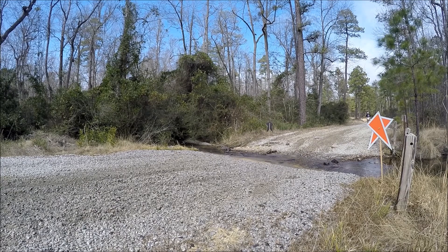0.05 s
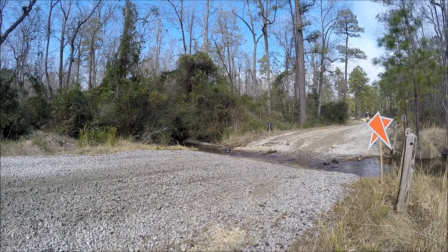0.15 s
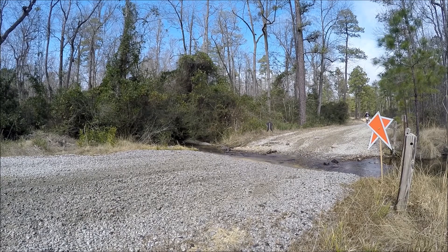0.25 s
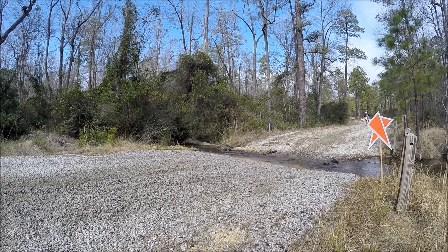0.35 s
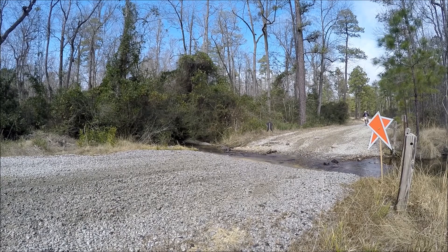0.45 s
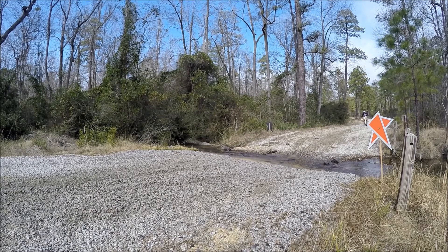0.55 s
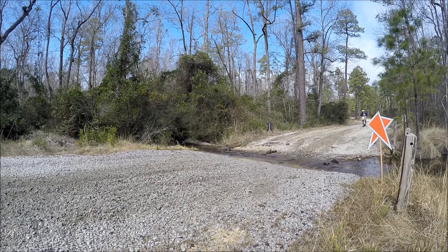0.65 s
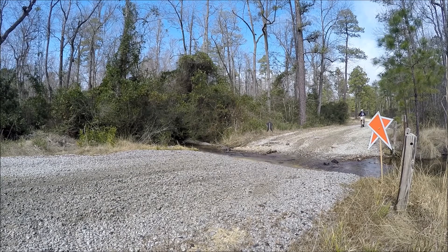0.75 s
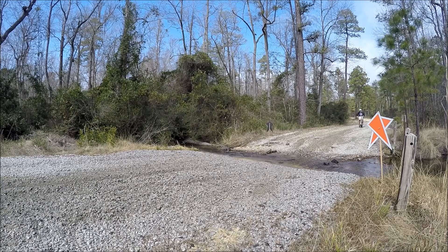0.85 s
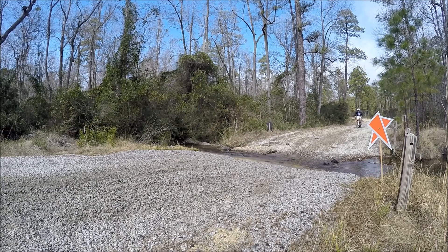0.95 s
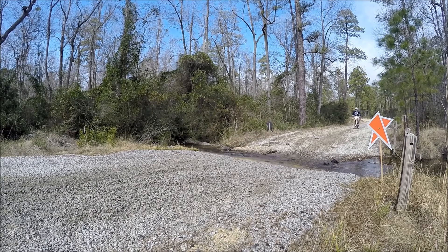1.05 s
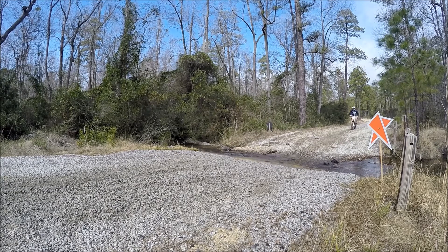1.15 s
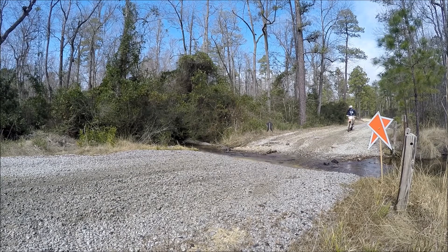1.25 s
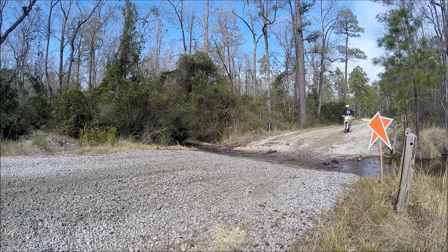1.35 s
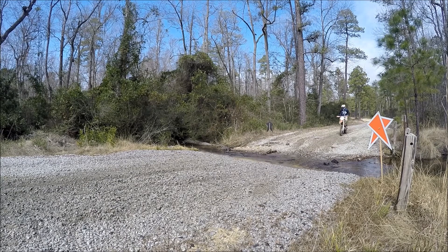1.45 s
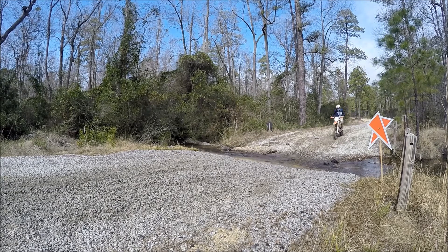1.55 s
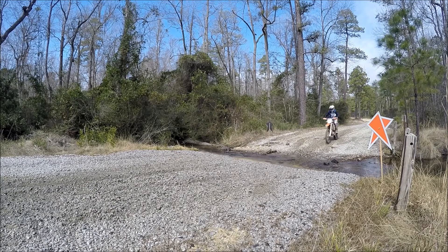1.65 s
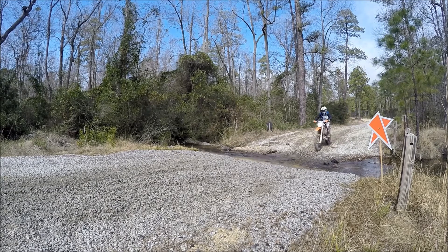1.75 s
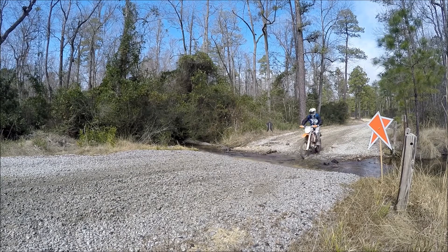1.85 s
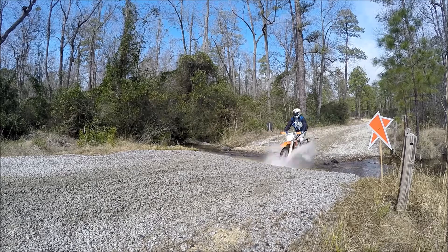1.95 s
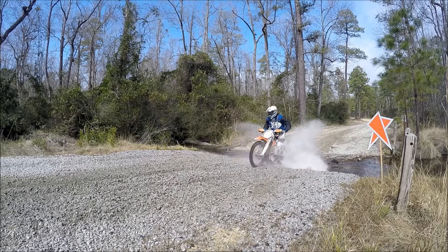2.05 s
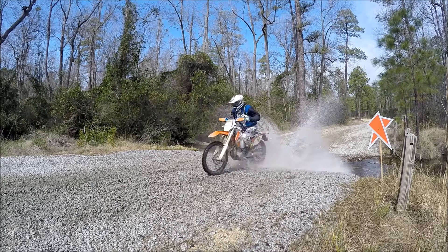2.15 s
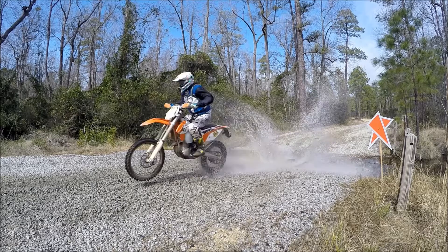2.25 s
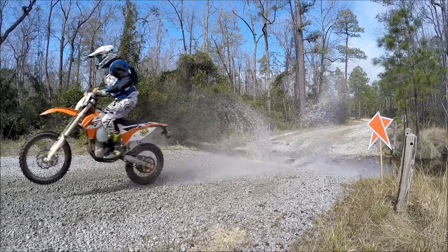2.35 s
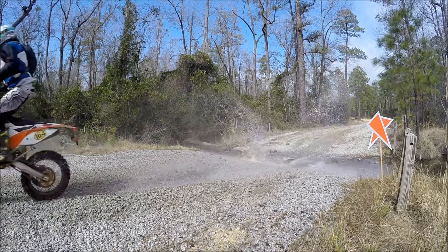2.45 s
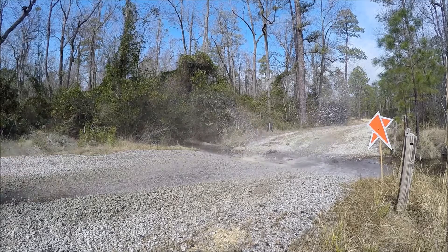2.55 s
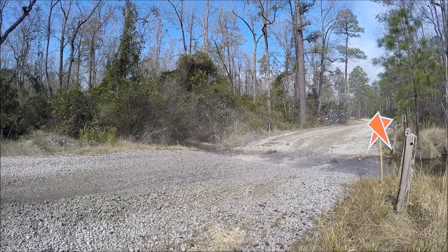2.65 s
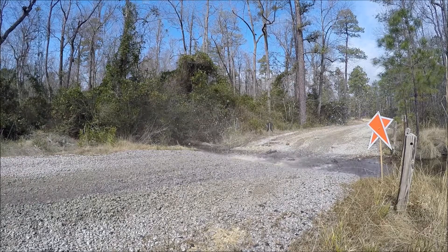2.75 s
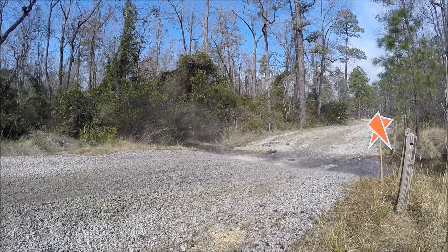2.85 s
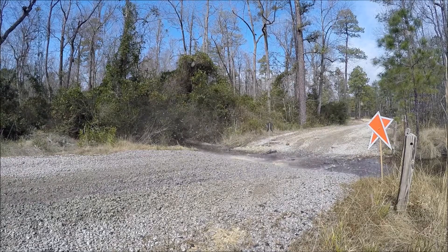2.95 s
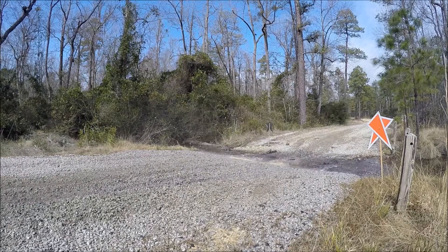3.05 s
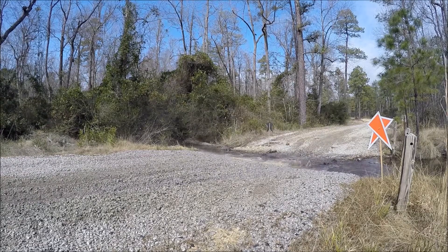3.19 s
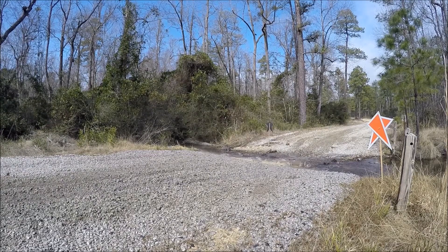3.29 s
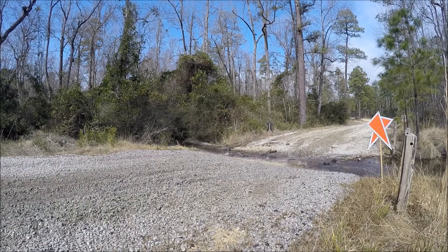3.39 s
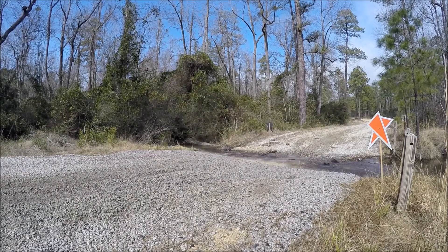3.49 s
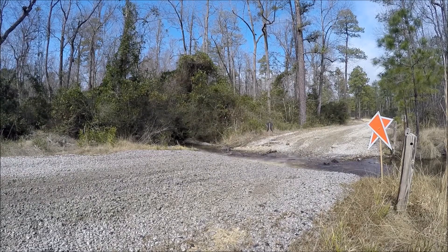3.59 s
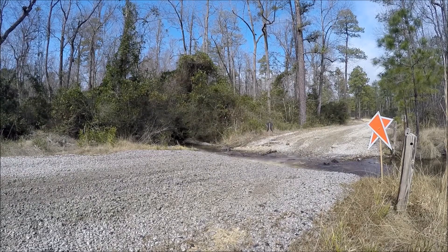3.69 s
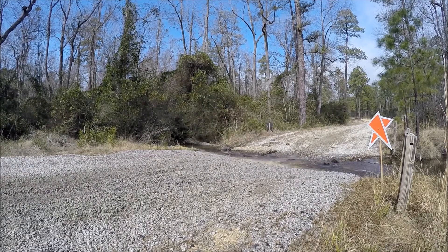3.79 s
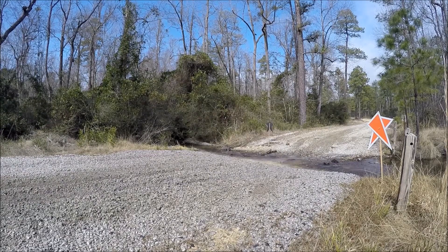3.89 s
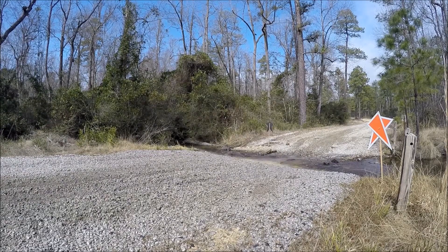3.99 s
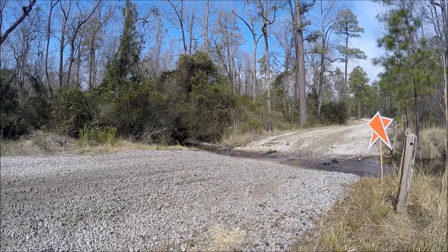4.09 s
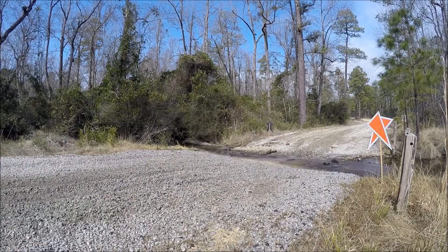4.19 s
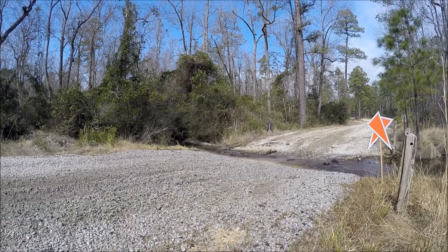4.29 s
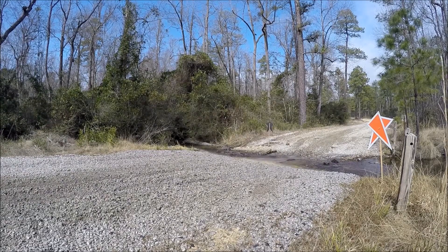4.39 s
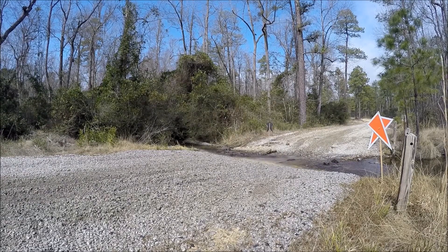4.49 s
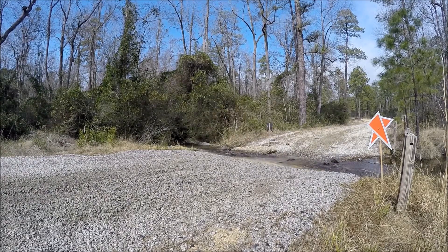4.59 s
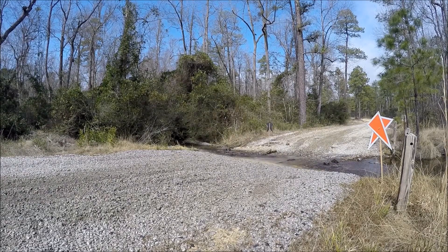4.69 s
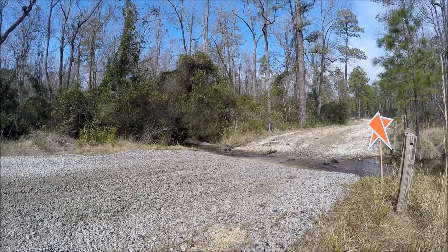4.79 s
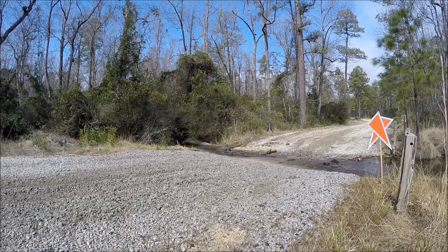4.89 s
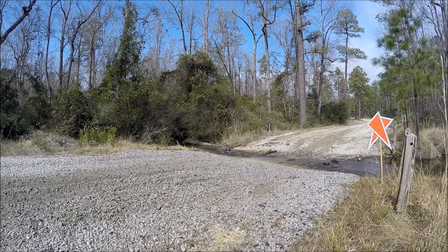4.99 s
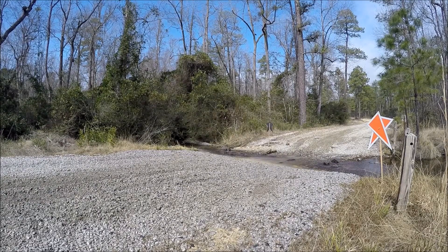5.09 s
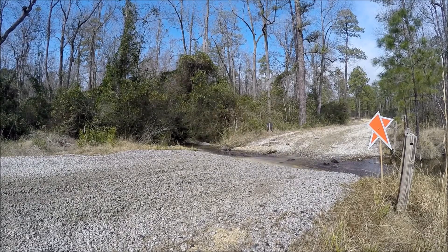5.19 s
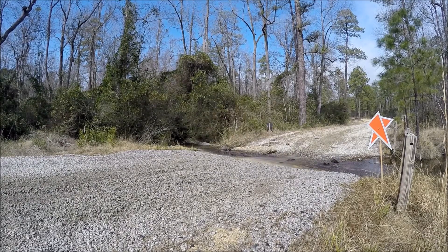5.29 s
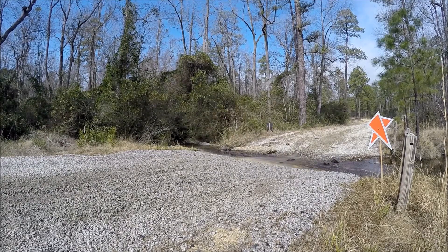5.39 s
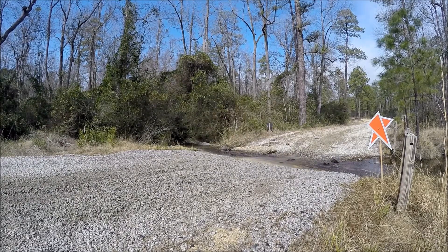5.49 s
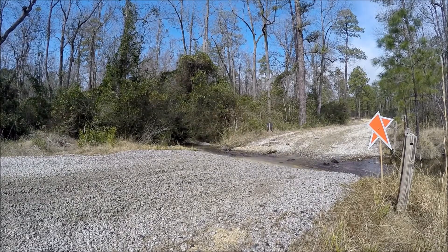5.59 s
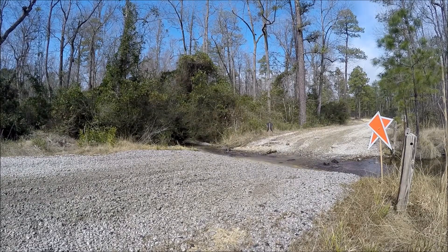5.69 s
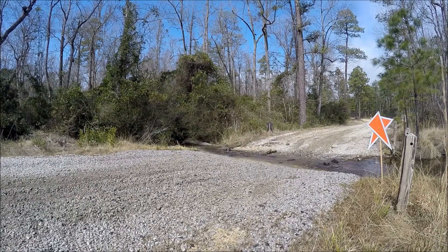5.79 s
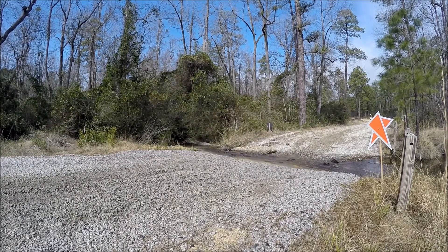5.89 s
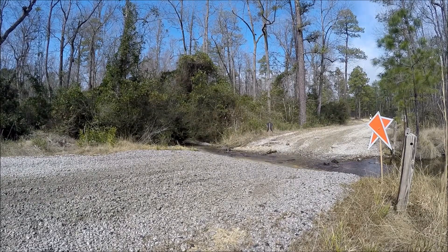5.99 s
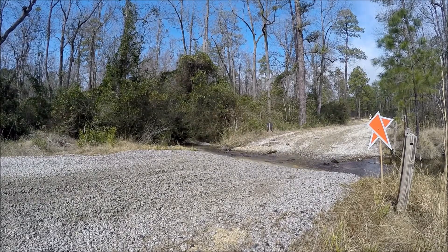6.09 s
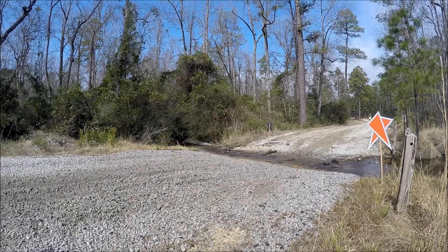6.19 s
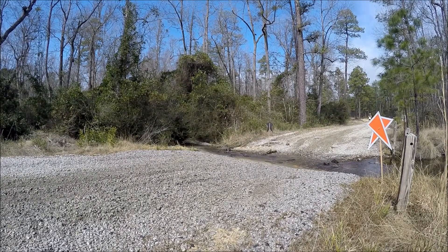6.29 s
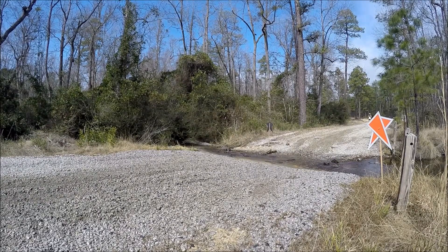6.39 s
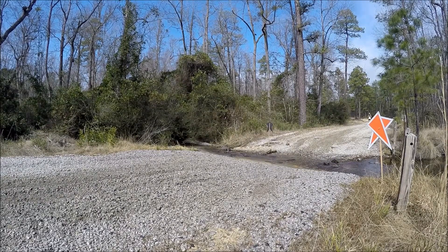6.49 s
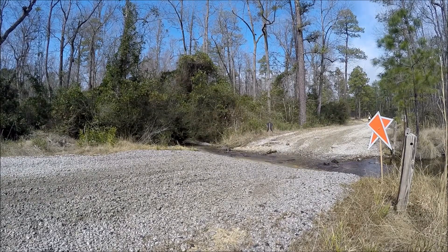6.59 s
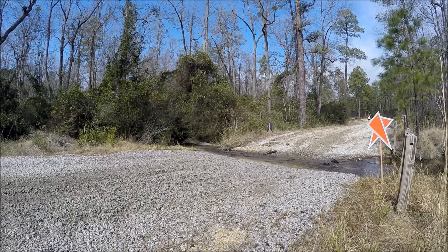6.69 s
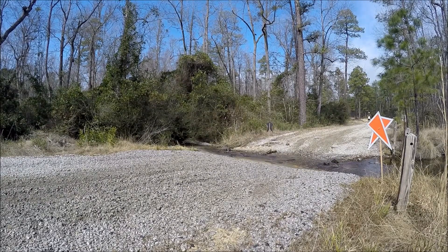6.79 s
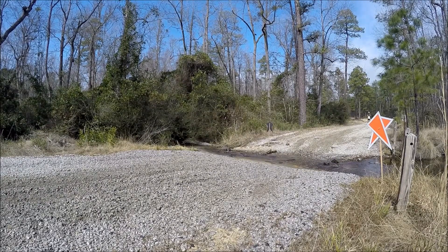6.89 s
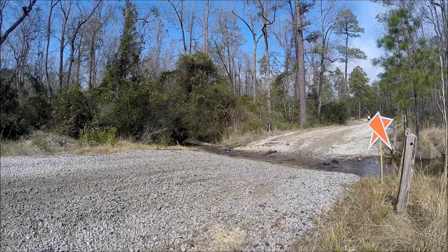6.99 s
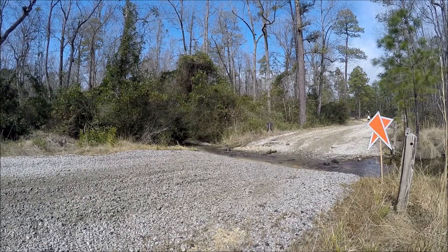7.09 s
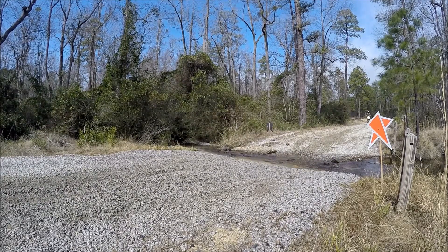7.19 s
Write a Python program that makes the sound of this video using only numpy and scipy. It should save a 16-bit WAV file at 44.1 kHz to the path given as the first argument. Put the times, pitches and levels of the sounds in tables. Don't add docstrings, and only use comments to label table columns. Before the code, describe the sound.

A single-cylinder dirt bike approaches on a gravel forest road, splashes through a creek, barks loudly past, revs up, shifts and fades among trees.

```python
import sys
import numpy as np
from scipy import signal
from scipy.fft import rfft, irfft
from scipy.io import wavfile
from scipy.ndimage import uniform_filter1d, map_coordinates

SR = 44100
rng = np.random.default_rng(int(sys.argv[2]) if len(sys.argv) > 2 else 0)


def materialize(psi):
    bounded = np.clip(np.atleast_2d(psi).T, -1, 1)
    quanta = np.round(bounded * 32767).astype(np.int16)
    wavfile.write(sys.argv[1], SR, quanta)


def boost_factor(decibels):
    exponent = np.asarray(decibels, float) / 20
    return 10 ** exponent


N = 319712

# frequency in Hz, strength in dB per Hz.
FOREST_COLOUR = [(240, -27.5), (400, 2.5), (752, -11.5), (2010, -7), (2870, -17), (3190, -35), (4210, -8),
                 (5140, -24), (14200, -35), (15800, -54)]
# frequency in Hz, strength in dB per Hz.
RUMBLE_COLOUR = [(15, -51), (35, -12), (60, -10), (110, -7.5), (180, -13), (350, -16), (600, -58.5)]
# frequency in Hz, strength in dB per Hz.
BUFFET_COLOUR = [(20, -36), (44, -10), (60, -2), (85, -18), (130, -39), (200, -97)]
# frequency in Hz, time to fall by 60 dB in seconds.
TREE_ECHO = [(100, 1), (1000, 0.45), (8000, 0.28)]
# frequency in Hz, strength in dB per Hz.
HOUSING_COLOUR = [(350, -17.5), (600, -1.5), (656, 0.5), (762, -5), (998, 3.5), (1660, 5), (1810, -0.5),
                  (2300, 5.5), (2520, 0), (2900, -4), (3300, 3), (3680, -1), (4150, 3.5), (5120, -6.5),
                  (6500, -32.5), (8450, -63), (14300, -120)]
# frequency in Hz, width in Hz, strength in dB.
HOUSING_RINGS = [(1058, 69, -5.5), (2010, 71, 2), (2346, 34, -4.5), (3250, 300, 0.5), (3910, 100, 1),
                 (5370, 41, -17)]
# frequency in Hz, strength in dB per Hz.
AIRY_COLOUR = [(3240, -37), (5500, -1.5), (5770, -0.5), (6220, -5), (6740, -4.5), (7560, -12), (9260, -16),
               (10300, -14), (11600, -23), (13000, -16), (14900, -26), (15800, -38)]

# time in seconds, firings per second, bark in dB.
FAR_ENGINE = [
    (6.3, 35.3, -68),
    (6.52, 37.2, -61.5),
    (6.624, 35.2, -57.5),
    (6.836, 34, -58.5),
    (6.96, 39, -60),
    (7.044, 40.3, -60),
    (7.122, 37, -55.5),
    (7.25, 34, -57.5),
]
# frequency in Hz, strength in dB per Hz.
FAR_PIPE_COLOUR = [(15, -40), (25, 6), (52, -3), (101, -1), (111, -16), (165, -5), (307, -2), (489, -10),
                   (616, -31), (800, -45), (1040, -69), (1760, -120)]
# frequency in Hz, level in dB.
FAR_HUM = [(95, -55), (106, -41), (120, -54), (132, -55), (142, -52), (156, -43.5), (165, -51)]

# time in seconds, peak in dB, airy part in dB relative,
# time to fall by 60 dB in seconds, pitch in Hz.
SHORT_KNOCKS = [
    (2.127, -3.5, -20, 0.047, 3480),
    (4.9117, -25, -5.5, 0.027, 3230),
    (5.071, -29, -0.5, 0.017, 3630),
    (5.1725, -34.5, 0, 0.017, 3940),
    (5.2688, -23, -8.5, 0.013, 3521),
    (6.483, -37.5, -35, 0.051, 1689),
]
# start in seconds, length in seconds, level in dB,
# fine spray in dB relative, low part in dB relative.
WATER_SHEETS = [
    (1.749, 0.015, -39.5, -12, -4),
    (1.857, .02, -36, -17, -9),
    (1.888, 0.013, -27.5, -16, -15),
    (1.935, .06, -26, -15, -11),
    (2.052, 0.12, -32.5, -15.5, -6.5),
    (2.189, 0.083, -24.5, -18.5, -1.5),
    (2.277, 0.026, -23, -19, -8),
    (2.332, .08, -26.5, -7.5, -6),
    (2.465, 0.048, -31.5, -10, -3),
    (2.514, 0.04, -37, 1.5, 4.5),
]

# time in seconds, firings per second.
ENGINE_SPEED = [(0, 49.7), (.6, 50.5), (.86, 50.5), (.98, 43), (1.15, 47), (1.6, 50.6), (2.17, 52.6),
                (2.78, 50.6), (2.9, 54.9), (3.1, 54.6), (3.49, 68.4), (3.66, 63.1), (3.95, 68.3),
                (4.05, 66.6), (4.2, 54.5), (4.35, 49.3), (4.71, 55.4), (5.1, 52.3)]
# slips, fastest, bites and grips in seconds, extra firings per second.
WHEEL_SPINS = [
    (0.248, 0.453, .52, 0.57, 3.47),
    (1.597, 1.739, 2.04, 1.72, 2.7),
    (1.806, 1.91, 1.93, 1.84, 2.8),
    (2.179, 2.323, 2.52, 2.6, 18.5),
    (3.221, 3.333, 3.12, 3.5, 1.6),
    (4.383, 4.458, 4.55, 4.68, 1.494),
    (4.74, 4.858, 4.86, 4.83, 1.294),
    (5.039, 5.205, 6, 5.54, 1.33),
    (5.659, 5.829, 5.88, 5.97, 5.4),
]
# time in seconds, level in dB.
MACHINE_LEVEL = [(0, -46.5), (.8, -44.5), (1.2, -42), (1.6, -33), (1.8, -32.5), (2.13, -27), (2.21, -19),
                 (2.33, -26), (2.55, -23), (2.72, -18.5), (2.87, -12.5), (3.05, -17), (3.21, -17.5),
                 (3.45, -24), (4.0, -28), (4.5, -27), (5.2, -32.5), (5.85, -38.5)]
# opens, eases and time to shut in seconds, aspect,
# share of crack in the treble (0 to 1) at first and at last.
THROTTLE_OPENINGS = [(-.2, 0.098, 0.14, "idle", 0.2, .01), (0.044, .84, 0.054, "ahead", 0.37, 0),
                     (0.783, 1.078, 0.14, "overrun", 0, .01), (1.034, 2.135, 0.11, "ahead", 0.05, 0.12),
                     (2.084, 2.29, 0.098, "abreast", 0.6, 0), (2.25, 2.603, 0.088, "wading", 0.08, 0.3),
                     (2.559, 2.799, 0.071, "lugging", 0.16, 0.88),
                     (2.745, 3.306, 0.076, "lugging", 0.96, .97),
                     (3.261, 4.027, 0.053, "revving", 0.83, 0.38),
                     (4.23, 5.198, 0.069, "leaving", 0.86, 0.3), (5.212, 5.418, 0.19, "easing", .97, 0.86),
                     (5.417, 5.64, .1, "idle", 0, .01), (5.645, 5.849, .08, "leaving", 0.66, .7),
                     (5.8, 6.499, 0.078, "idle", 0.03, 0.05)]
ASPECT_LEVELS = {"shut": (-10.5, -20, -14.5, -20.5, -32.5), "idle": (-10, -11, -5.5, -26.5, -35),
                 "overrun": (5.5, -4, -1.5, -11.5, -21), "ahead": (-1.5, 0, -8.5, -9.5, -24.5),
                 "abreast": (0.5, -12, 1.5, -12, -20.5), "wading": (-1, -2.5, 0, -11.5, -23.5),
                 "lugging": (-0.5, -13.5, -4.5, -9, -25), "revving": (1.5, -6, 6.5, -7.5, -23),
                 "easing": (-4.5, -5, -6.5, -9.5, -29), "leaving": (-0.5, -8, -7, -11.5, -27)}
ASPECT_ROUGHNESS = {"shut": .22, "idle": .15, "overrun": .08, "ahead": .13, "abreast": .07, "wading": .15,
                    "lugging": .04, "revving": .035, "leaving": .045, "easing": .06}
# time in seconds, length in seconds, boost in dB.
IDLE_LURCHES = [
    (0.053, 0.086, 10),
    (6.016, .045, 6),
    (6.14, 0.032, 1.5),
    (6.276, 0.032, 4),
    (6.38, 0.039, 4.5),
]

# frequency in Hz, strength in dB per Hz.
BARK_COASTING = [(65, -43), (110, -7.5), (135, 9), (311, -11), (451, -10), (800, -28), (1040, -71),
                 (1760, -120)]
BARK_AHEAD = [(76, -70.5), (130, -15), (167, -12), (190, 0.5), (205, -1), (284, -6.5), (419, -1),
              (604, -17), (800, -23), (1040, -86), (1760, -120)]
BARK_ABREAST = [(76, -24.5), (130, -23), (156, -0.5), (183, -5.5), (226, -6), (270, 0.5), (419, -7.5),
                (560, -10.5), (800, -20), (1040, -69), (1760, -120)]
BARK_LUGGING = [(76, -53), (130, -8), (178, -22), (205, -10.5), (236, -7), (270, -1.5), (350, -11.5),
                (381, -11), (738, -20), (850, -36), (1100, -25), (1870, -120)]
BARK_REVVING = [(76, -60), (130, 6), (262, -2), (323, 1.5), (464, 3.5), (690, -13.5), (800, -51),
                (1100, -50), (1870, -120)]
BARK_LEAVING = [(76, -37), (130, -20), (155, -15.5), (262, 3.5), (387, -1), (850, -22), (1100, -11),
                (1870, -120)]
# frequency in Hz, strength in dB per Hz.
CRACK_NEAR = [(410, -25), (700, -13), (850, -9), (1050, -1.5), (2040, -21), (2280, -12), (2890, -17.5),
              (4080, -13), (4570, -22.5), (8000, -59), (10400, -79), (17600, -120)]
CRACK_FAR = [(410, -36), (700, -17), (931, -7), (1040, 7.5), (1410, -2), (2280, -8.5), (2530, -7),
             (3650, 0), (4570, -13.5), (5770, -11.5), (8000, -30), (10400, -97), (17600, -120)]
# time in seconds, delay in milliseconds.
ROAD_BOUNCE = [(0, 0.36), (2.3, 0.82), (2.47, 1.7), (2.56, 1.85), (2.68, 1.068), (2.97, 0.7), (3.3, .5),
               (4.3, .22), (7.25, 0.24)]

FOREST_DB = -57.5
SPLIT_HZ = 1500
COAST_HZ_PER_S, GONE_S = 8.2, 6.45
SPIN_SAG = 0.6
SPLASH_RISE_S, SPLASH_FALL_DB_PER_S = 0.005, 206
LOW_DB, FIZZ_DB = -3, -16.5
STILL_DB = -62
OPEN_S = 0.12
LINGER_S = 0.04


def unit(x):
    return x / np.sqrt(np.mean(x ** 2) + 1e-20)


def along(points, hz):
    f, v = np.transpose(points)
    return np.interp(np.log(hz + 1), np.log(f + 1), v)


def curves(rows):
    s, *columns = np.transpose(rows)
    return [np.interp(np.arange(N) / SR, s, c) for c in columns]


def coloured(x, spectrum, lag=1, turn=0):
    m = 8192
    strength = boost_factor(along(spectrum, np.fft.rfftfreq(m, 1 / SR)))
    cepstrum = irfft(np.log(strength + 1e-6), m)
    cepstrum[1:m // 2] *= 2
    cepstrum[m // 2 + 1:] = 0
    log = rfft(cepstrum)
    response = irfft(np.exp(log.real + 1j * (lag * log.imag + turn)), m)
    response = np.roll(response, m // 2)
    return unit(signal.oaconvolve(x, response)[m // 2:][:N])


def rung(x, modes, through):
    f = np.fft.rfftfreq(N, 1 / SR)
    gain = through + sum(boost_factor(db) * 1j * f * w / (c * c - f * f + 1j * f * w) for c, w, db in modes)
    return unit(irfft(rfft(x) * gain, N))


def halves(x):
    z, hz = rfft(x), np.fft.rfftfreq(N, 1 / SR)
    above = 1 / (1 + (SPLIT_HZ / (hz + 1)) ** 8)
    return unit(irfft(z * (1 - above), N)), unit(irfft(z * above, N))


def patchy(depth_db):
    z = signal.stft(rng.standard_normal(N + 512), nperseg=256)[2]
    field = uniform_filter1d(rng.standard_normal(z.shape), size=8, axis=0)
    field = uniform_filter1d(field, size=8, axis=1)
    return signal.istft(z * boost_factor(depth_db * unit(field)), nperseg=256)[1][:N]


def firings(turns, rate, rough, late, scatter_db):
    at = np.flatnonzero(np.diff(np.floor(turns)) > 0)
    luck = rng.standard_normal((N // 400, 2))[:len(at)]
    size = boost_factor(scatter_db * luck[:, 1] * (0.22 + rough[at])) / np.sqrt(rate[at])
    shift = (late * rough[at] * luck[:, 0] * SR / rate[at]).astype(int)
    at = np.clip(at + shift, 0, N - 1)
    return at, np.bincount(at, size, N)


def bursts(at, scatter_db, t60):
    strength = boost_factor(scatter_db * rng.uniform(-1.68, 1, N // 400)[:len(at)])
    starts = np.bincount(at, strength, N)
    t = np.arange(SR // 10) / SR
    shape = boost_factor(-60 * t / t60) * (1 - np.exp(-t / 0.0003))
    return unit(signal.oaconvolve(starts, shape)[:N] * rng.standard_normal(N))


def forest():
    return boost_factor(FOREST_DB) * coloured(patchy(depth_db=-4.5), FOREST_COLOUR)


def trees(x):
    hz, t, z = signal.stft(rng.standard_normal(SR // 2), SR, nperseg=256)
    decay = boost_factor(-60 * t / along(TREE_ECHO, hz)[:, None])
    tail = signal.istft(z * decay, SR, nperseg=256)[1]
    late = np.pad(x, (700, 0))
    return signal.fftconvolve(late, tail / np.linalg.norm(tail))[:N]


def far_motorcycle():
    rate, level_db = curves(FAR_ENGINE)
    turns = np.cumsum(rate) / SR
    pulses = firings(turns, rate, np.full(N, 0.1), late=0.08, scatter_db=4)[1]
    hum = sum(boost_factor(along(FAR_HUM, k * rate)) * np.sin(2 * np.pi * k * turns) for k in (3, 4))
    thumps = coloured(unit(pulses) + 0.12 * rng.standard_normal(N), FAR_PIPE_COLOUR)
    fade_in = np.clip((np.arange(N) / SR - FAR_ENGINE[0][0]) / 0.22, 0, 1)
    return fade_in * (1.08 * hum + boost_factor(level_db + 9) * thumps)


def rumble():
    near_db = uniform_filter1d(loudness(throttle()[0], part=1), size=SR // 4)
    closeness = np.exp(-((np.arange(N) / SR - 2.6) / 0.38) ** 2)
    buffet = boost_factor(-22.5) * closeness * coloured(rng.standard_normal(N), BUFFET_COLOUR)
    return (boost_factor(near_db - 15) + boost_factor(-48.5)) * coloured(patchy(depth_db=3.0), RUMBLE_COLOUR) + buffet


def knocks():
    body = coloured(rng.standard_normal(N), HOUSING_COLOUR)
    top = coloured(rng.standard_normal(N), AIRY_COLOUR)
    t, out = np.arange(N) / SR, np.zeros(N)
    for s, db, top_db, t60, hz in SHORT_KNOCKS:
        lead = 0.004 + 0.03 * min(boost_factor(db), 1)
        shape = boost_factor(np.where(t > s, -60 * (t - s) / t60, 60 * (t - s) / lead))
        pitched = rung(body, [(hz, 0.11 * hz, 0)], through=0.48)
        out += boost_factor(db - 6.0) * shape * (pitched + boost_factor(top_db) * top)
    return out


def splashes():
    t, power = np.arange(N) / SR, np.zeros((3, N))
    for s, length, db, fine_db, low_db in WATER_SHEETS:
        fall_db = SPLASH_FALL_DB_PER_S * np.maximum(t - s - length, 0)
        shape = np.clip((t - s) / SPLASH_RISE_S, 0, 1) * boost_factor(db - fall_db)
        power += (shape * boost_factor(np.array([[0], [fine_db], [low_db]]))) ** 2
    return power


def speed():
    t = np.arange(N) / SR
    spins = sum(np.interp(t, when, [0, extra, SPIN_SAG * extra, 0]) for *when, extra in WHEEL_SPINS)
    coasting = COAST_HZ_PER_S * np.maximum(t - ENGINE_SPEED[-1][0], 0)
    return curves(ENGINE_SPEED)[0] - coasting + spins


def throttle():
    t = np.arange(N) / SR
    seen, crack = {name: np.zeros(N) for name in ASPECT_LEVELS}, np.zeros(N)
    for opens, eases, closing, name, first, last in THROTTLE_OPENINGS:
        on = np.interp(t, [opens, opens + OPEN_S, eases, eases + closing], [0, 1, 1, 0])
        seen[name] += on
        crack += on * np.interp(t, [opens, eases], [first, last])
    total = sum(seen.values())
    seen["shut"] = np.clip(1 - total, 0, 1)
    overlap = np.maximum(total, 1)
    return {name: w / overlap for name, w in seen.items()}, crack / overlap


def loudness(seen, part):
    return curves(MACHINE_LEVEL)[0] + sum(w * ASPECT_LEVELS[name][part] for name, w in seen.items())


def fading():
    return np.clip((GONE_S - np.arange(N) / SR) / 0.067, 0, 1)


def trailing(level):
    late = np.pad(level, (round(LINGER_S * SR), 0), "edge")[:N]
    return uniform_filter1d(late, size=3000)


def road(x):
    delay_ms = curves(ROAD_BOUNCE)[0]
    dull = uniform_filter1d(x, size=3)
    copy = map_coordinates(dull, [np.arange(N) - delay_ms * SR / 1000], order=1)
    return (x + np.clip(1.5 - 0.8 * delay_ms, 0.3, 0.8) * copy) / 1.7


def treble_levels():
    seen, share = throttle()
    machine, grit = (fading() * boost_factor(loudness(seen, part=k)) for k in (3, 4))
    share = np.clip(share, 0, 0.98)
    far = np.clip((np.arange(N) / SR - 3.3) / 0.5, 0, 1)
    low_share = share * (1 - 0.46 * far)
    return machine, grit, share, low_share, far


def rush():
    machine, grit, share, low_share, _ = treble_levels()
    water, water_fine, water_low = splashes()

    def steady(level, part, db, wet):
        dry_power = trailing(level) ** 2 * (1 - part) + boost_factor(STILL_DB) ** 2
        return np.sqrt(dry_power * boost_factor(db) ** 2 + wet)

    noise = rung(patchy(depth_db=1.5), HOUSING_RINGS, through=1.0)
    low, high = halves(coloured(noise, HOUSING_COLOUR))
    fizz = coloured(patchy(depth_db=1.0), AIRY_COLOUR)
    out = steady(machine, share, 0, water) * high
    out += steady(machine, low_share, LOW_DB, water_low) * low
    return out + steady(grit / boost_factor(FIZZ_DB), 0.85 * share, FIZZ_DB, water_fine) * fizz


def cracks(at):
    machine, grit, share, low_share, far = treble_levels()
    at = np.maximum(at - round(0.0016 * SR), 0)
    puff = bursts(at, scatter_db=2.0, t60=0.011) + 0.5 * bursts(at, scatter_db=-2.5, t60=0.0064)
    puff = road(puff)
    low, high = halves((1 - far) * coloured(puff, CRACK_NEAR) + far * coloured(puff, CRACK_FAR))
    spit = coloured(bursts(at, scatter_db=7, t60=0.015), AIRY_COLOUR)
    crack = machine * (np.sqrt(share) * high + boost_factor(LOW_DB) * np.sqrt(low_share) * low)
    return crack + 0.9 * grit * np.sqrt(share) * spit


def exhaust():
    rate, seen = speed(), throttle()[0]
    t = np.arange(N) / SR
    bark_db, first_db, second_db = (loudness(seen, part=k) for k in range(3))
    bark_db = bark_db + sum(db * np.exp(-((t - s) / length) ** 2) for s, length, db in IDLE_LURCHES)
    rough = sum(w * ASPECT_ROUGHNESS[name] for name, w in seen.items())
    turns = np.cumsum(rate) / SR + 0.62
    at, pulses = firings(turns, rate, rough, late=0.1, scatter_db=3)
    drive = unit(pulses) + 1.2 * rough * rng.standard_normal(N)
    pipes = [
        (seen["shut"] + seen["idle"] + seen["overrun"], BARK_COASTING, 1.5),
        (seen["ahead"], BARK_AHEAD, 2.5),
        (seen["abreast"] + seen["wading"], BARK_ABREAST, 1.5),
        (seen["lugging"], BARK_LUGGING, -0.15),
        (seen["revving"], BARK_REVVING, -0.3),
        (seen["leaving"] + seen["easing"], BARK_LEAVING, -0.3),
    ]
    bark = sum(w * np.sign(-lag) * coloured(drive, pipe, lag, turn=-0.3) for w, pipe, lag in pipes)
    first = boost_factor(first_db) * np.sin(2 * np.pi * turns + 0.09)
    second = boost_factor(second_db) * np.sin(4 * np.pi * turns + 2.68)
    return fading() * (np.sqrt(2) * (first + second) + boost_factor(bark_db + 1.68) * road(bark)), at


def scene():
    low, at = exhaust()
    direct = low + cracks(at) + rush() + far_motorcycle() + knocks()
    hiss = boost_factor(-77.5) * rng.standard_normal(N)
    quiet = hiss + rumble() + forest()
    return (direct + boost_factor(-14.5) * trees(direct) + quiet)[None]


def roll_off(x):
    return signal.sosfilt(signal.butter(12, 15950, fs=SR, output="sos"), x)


def record(dry):
    soft = dry / (1 + abs(dry / 0.95) ** 6) ** (1 / 6)
    soft = irfft(rfft(soft) * (np.fft.rfftfreq(N, 1 / SR) < 15930), N)
    return roll_off(soft)


dry = scene()
out = record(dry)
materialize(out)
```